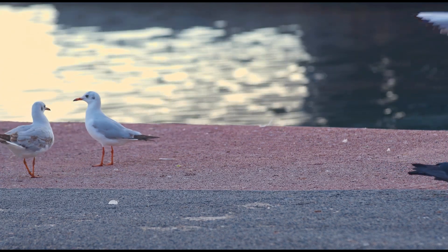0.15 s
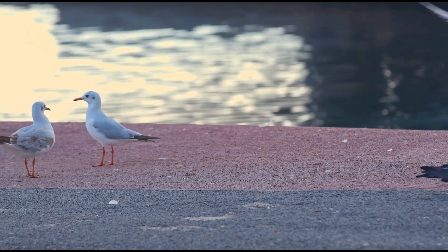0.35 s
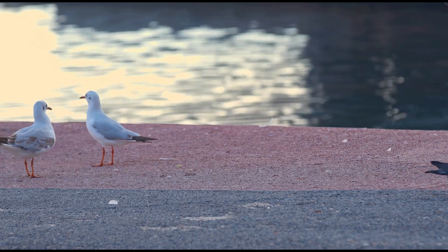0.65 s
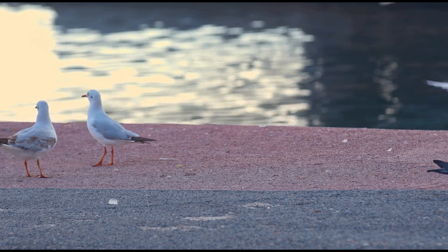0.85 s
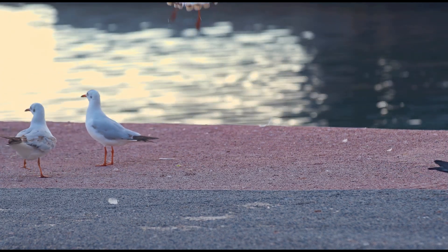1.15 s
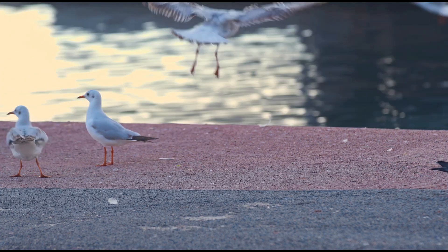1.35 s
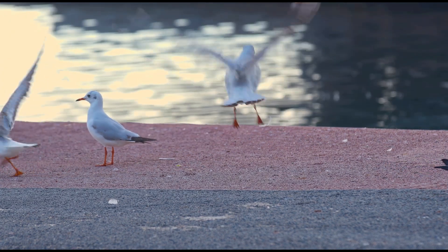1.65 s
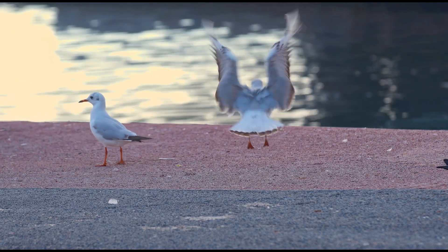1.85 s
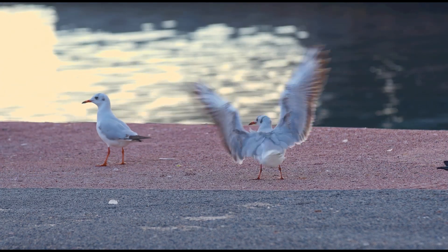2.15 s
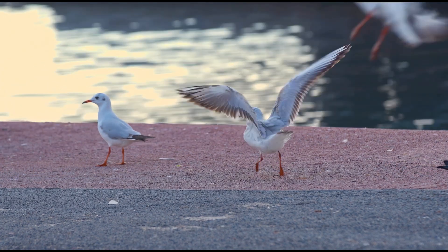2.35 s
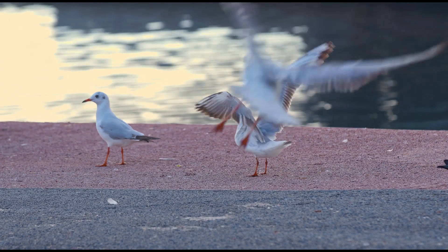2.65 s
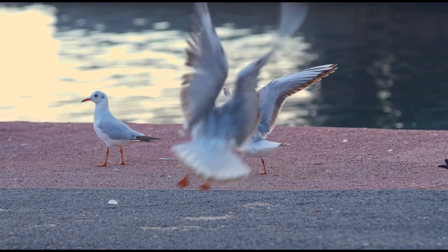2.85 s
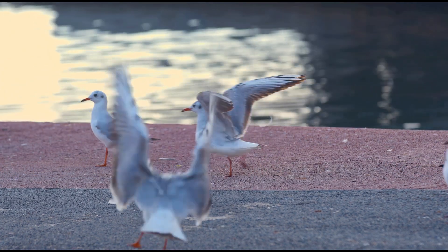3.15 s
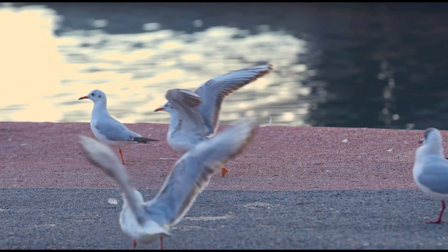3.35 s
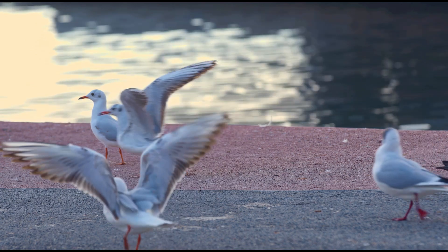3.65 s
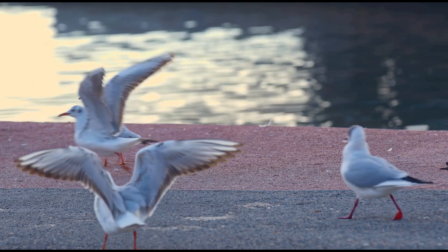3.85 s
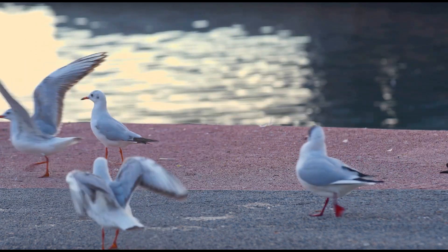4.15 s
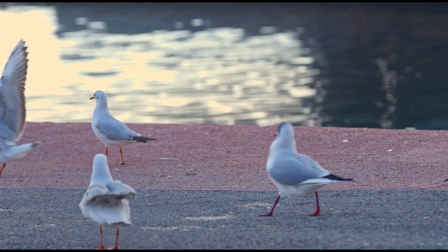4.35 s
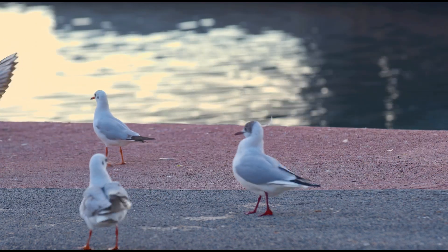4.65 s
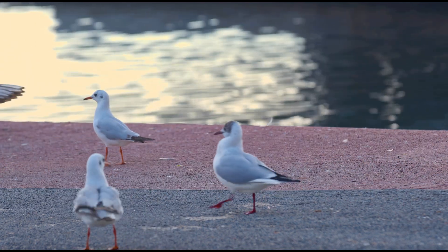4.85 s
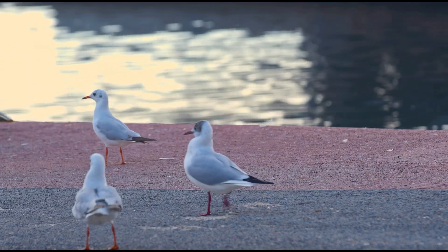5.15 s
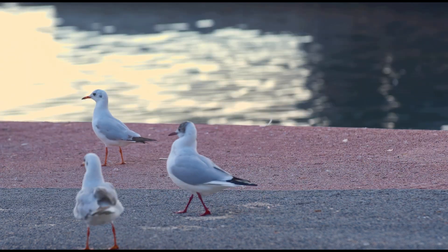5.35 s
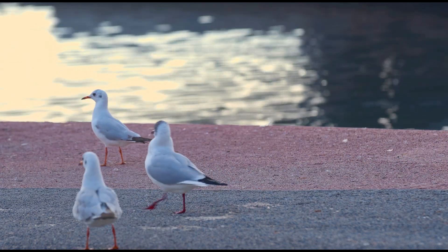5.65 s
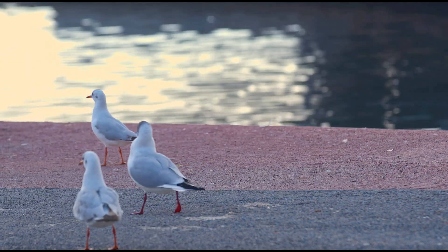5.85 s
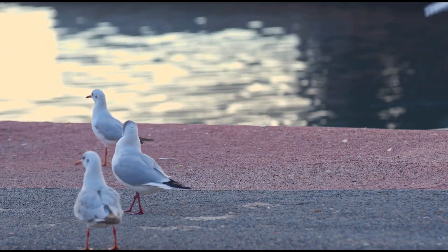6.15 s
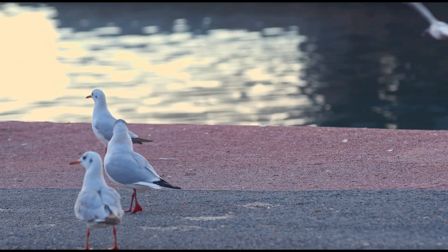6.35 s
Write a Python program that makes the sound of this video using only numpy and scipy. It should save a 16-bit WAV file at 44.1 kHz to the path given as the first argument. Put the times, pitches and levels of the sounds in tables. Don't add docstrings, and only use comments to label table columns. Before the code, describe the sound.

Open harbour edge in stereo: a deep steady drone, soft wind rumble and water washing against stone. A near gull, central and loud, gives four brief nasal yelps, the later ones less raspy, with a faint diffuse echo. Droplets and bubbles click between them. Then a quieter stretch brings faint distant bird whistles and low knocks, before bubbly wavelets swell again.

```python
import sys
import numpy as np
from scipy import signal
from scipy.io import wavfile
from scipy.ndimage import uniform_filter1d, minimum_filter1d

SR = 44100
rng = np.random.default_rng(int(sys.argv[2]) if len(sys.argv) > 2 else 0)


def to_wav(s):
    ch = np.atleast_2d(s).T
    pcm = np.round(np.clip(ch, -1, 1) * 32767)
    wavfile.write(sys.argv[1], SR, pcm.astype(np.int16))


def gain_from_decibels(decibels):
    exponent = np.asarray(decibels, float) / 20
    return 10 ** exponent


N = 286209

# (crest of the arch [s], crest pitch [Hz], clean hold after the crest [s],
# level at the crest [dB], level at the break [dB])
YELPS = [
    (.69, 696, 0.059, -9, -1),
    (1.302, 691, 0.059, -5, -6),
    (1.905, 692.8, .062, -5, -5.5),
    (2.478, 682.5, 0.057, -5, -7),
]


def yelp(crest_s, crest_hz, hold_s, crest_db, break_db):
    scrape_s, lock_s, climb_s, break_s, rasp_s, die_s = .024, .011, .033, .008, .06, .045
    climb_hz, rest_hz = 79.35, 410.6
    tired = 1 - np.exp(-(crest_s - YELPS[0][0]) / .61)
    start_s = crest_s - climb_s - lock_s - scrape_s
    s = np.cumsum([start_s, scrape_s, lock_s, climb_s, hold_s, break_s, rasp_s, die_s])
    t = np.arange(int(s[0] * SR), int(s[-1] * SR)) / SR

    rasp_db = -9 - 5.5 * tired
    level_db = np.interp(t, s, [-29, -21, -12.5, crest_db, break_db, rasp_db, rasp_db - 4, rasp_db - 28])

    climb = crest_hz - climb_hz * np.minimum((crest_s - t) / climb_s, 1) ** 2
    climb += np.interp(t, s[:3], [rest_hz + climb_hz - crest_hz, -105, 0])
    round_s = .027
    sag = crest_hz - 2300 * (np.hypot(np.minimum(t - crest_s, hold_s), round_s) - round_s)
    sag -= np.interp(t, s[4:6], [0, 34.83]) + 1900 * np.maximum(t - s[4], 0)
    hz = np.maximum(np.where(t < crest_s, climb, sag), rest_hz)

    bright_db = 5 - 4 * tired + .38 * (level_db + 4.5)
    return t, hz, level_db, bright_db


def gull(wobble=.021, half_db=-5, rasp_depth=.55, rasp_rate=520, drive=.35, breath_db=-42):
    # (frequency [Hz], level [dB])
    throat = [(350, -28.5), (650, -25), (900, -39.5), (1100, -5.5), (1260, 7), (1450, -3.5), (1650, -10),
              (2050, -19), (2400, -34.5), (2800, -34), (3550, -37), (3880, -33.5), (4150, -61),
              (4500, -44.5)]
    slack_hz, slack_width_hz = 592, 23.5
    out, airy = np.zeros((2, N))
    for row in YELPS:
        t, *columns = yelp(*row)
        start = round(t[0] * SR)
        stop = start + len(t)
        hz, db, bright_db = (uniform_filter1d(c, size=200) for c in columns)
        slack = .653 / (1 + np.exp((hz - slack_hz) / slack_width_hz))
        hz = hz * (1 + (wobble + .032 * slack) * walk(160 * len(t) / SR, (len(t),)))
        phase = 2 * np.pi * np.cumsum(hz) / SR

        orders = np.arange(1, 17)[:, None] / 2
        part_hz = orders * hz
        gains = gain_from_decibels(table(throat, part_hz) + bright_db * (part_hz > 2400))
        gains *= np.where(orders % 1, slack * gain_from_decibels(half_db), 1)
        gains /= np.sqrt(uniform_filter1d(np.sum(gains ** 2, axis=0), size=400) / 2)

        depth = np.clip(.045 * (orders - 1.2) ** 2, .09, .5) + rasp_depth * slack
        beats = 1 + depth * walk(rasp_rate * len(t) / SR, (16, len(t)))
        beats /= np.sqrt(1 + depth ** 2)
        tones = np.sin(orders * phase + 2 * np.pi * rng.random(orders.shape))
        edges = np.minimum(1, np.minimum(t - t[0], t[-1] - t) / 0.0055)
        out[start:stop] = np.sum(gains * beats * tones, axis=0) * gain_from_decibels(db) * edges
        airy[start:stop] = gain_from_decibels(1.8 * bright_db)

    bill = signal.butter(2, (3200, 4400), "band", fs=SR, output="sos")
    air = signal.sosfilt(bill, rng.standard_normal(N))
    loudness = np.sqrt(uniform_filter1d(out ** 2, size=150) + 1e-12)
    out += airy * air / air.std() * loudness * gain_from_decibels(breath_db)
    out = np.tanh(drive * out) / np.tanh(drive) * 1.073
    return signal.sosfiltfilt(signal.ellip(6, .5, 40, 4330, fs=SR, output="sos"), out)


def quay(voice, t60=1.1, wet_db=-23, side_db=-20):
    t = np.arange(SR) / SR
    tails = rng.standard_normal((2, SR)) * gain_from_decibels(-60 * t / t60) * (t > .02)
    mid, side = (signal.fftconvolve(voice, tail / np.linalg.norm(tail))[:N] * gain_from_decibels(wet_db) for tail in tails)
    return voice + mid + gain_from_decibels(side_db) * side * np.array([[1], [-1]])


def wash(t):
    # (breaks [s], crest [dB], rise [s], fall [dB per s], left minus right [dB])
    wall_waves = [(.1, -60, 0.22, 34, -0.5), (.86, -50.5, 0.045, 20.5, 1.5), (.9, -39, 0.26, 12, 1.5),
                  (1.2, -40.5, 0.12, 38.5, 1), (1.7, -59.5, 0.25, 3.5, 2), (2.25, -54.5, 0.078, 18, -3.5),
                  (2.85, -61, 0.22, 7.5, -4.5), (4, -63.5, 0.15, 3.5, -2.5), (2.33, -48, 0.047, 300, -4),
                  (2.45, -52.5, 0.18, 15, -5), (2.72, -56, 0.019, 152, -5),
                  (3.38, -55.5, 0.024, 10.5, -11.5), (3.45, -58.5, 0.27, 16, -10),
                  (3.6, -64, 0.11, 63, -10.5), (5.3, -54.5, 0.24, 10, 6.5), (5.6, -47, 0.28, 23.5, 3),
                  (6.08, -46, 0.024, 200, 1.5), (6.1, -52.5, .1, 8.5, 0.5), (6.3, -55, 0.18, 10, -8.5)]
    calm_db, calm_pan_db = -64.5, -6.5
    at, crest_db, rise, fall_db, pan_db = np.array(wall_waves).T[:, :, None]
    since = t - at
    climb_db = 14.5 * (1 - since / rise) ** 2
    drain_db = fall_db * (since - rise) + 13 * (since - rise) ** 2
    db = crest_db - np.where(since < rise, climb_db, drain_db)
    power, calm = gain_from_decibels(2 * db), gain_from_decibels(2 * calm_db)
    total = power.sum(axis=0) + calm
    return 10 * np.log10(total), ((power * pan_db).sum(axis=0) + calm * calm_pan_db) / total


def waves(trim_db=14, body_trim_db=-6, spray_trim_db=4):
    # (frequency [Hz], level [dB per Hz])
    fizz_colour = [(180, -37.5), (300, -7), (420, -5.5), (700, -8.5), (1050, -4.5), (1500, -13),
                   (2200, -17.5), (4500, -18), (8000, -24.5), (11500, -24), (14500, -37)]
    # (frequency [Hz], unrelated part minus shared part [dB])
    fizz_side = [(300, -10), (1200, -14), (3000, -16), (6000, -10.5), (10000, -8), (14000, -7)]
    # (time [s], level [dB], length [s])
    surges = [
        (.2, -40, 0.27),
        (.76, -33, 0.063),
        (1.84, -30.5, 0.13),
        (2.3, -33, .08),
        (3.7, -38, 0.17),
        (5.92, -31, 0.17),
    ]

    def shape(hz, t):
        low = 1 / (1 + (hz / 1800) ** 2)
        high = 1 / (1 + (9000 / (hz + 1)) ** 4)
        fizz, pan_db = wash(t)
        body = -34 + .58 * (wash(t - .084)[0] + 50)
        body = 10 * np.log10(gain_from_decibels(2 * body) + bumps(surges, t)) + body_trim_db
        spray = -56.5 + spray_trim_db + 1.35 * (fizz + 50) - .3 * pan_db
        swell = low * body + high * spray + (1 - low - high) * fizz
        return table(fizz_colour, hz) - table(fizz_colour, 3400.0) + swell + trim_db - 60 * (hz < 250)

    def lean(hz, t):
        return wash(t)[1] / (1 + 900 / (hz + 1))

    return hiss(shape, fizz_side, lean, flicker_db=1.3, flicker_rate=60, size=256, lag=1.28)


def droplets(rate=260, over_db=4.0, spread_db=4.0):
    # (time [s], peak [dB], pitch [Hz], left minus right [dB])
    drops = [(0.276, -40, 2980, -8), (0.876, -32, 3680, -2), (0.9215, -26, 3070, -1),
             (0.9637, -31, 2760, -3.5), (0.9781, -25, 3810, 2), (1.0328, -24, 3100, -2),
             (2.074, -45, 2900, -3.5), (2.18, -33.5, 2900, 0), (2.237, -36.5, 4340, -2),
             (2.3206, -39, 4100, -4.5), (2.355, -30.5, 3420, -7), (2.372, -25, 4260, -8),
             (2.433, -29.5, 3060, 3.5), (2.9048, -34, 3180, -4), (3.3983, -37, 2900, -5),
             (3.631, -37, 5550, -12.5), (5.4303, -42.5, 4330, -1), (5.5573, -39, 3090, 2),
             (5.68, -38, 4440, -2.5), (5.756, -32.5, 3050, 4), (5.8173, -31, 3400, 3),
             (5.9094, -33.5, 3040, 3), (6.101, -28, 4440, 1), (6.1526, -36.5, 4430, 2),
             (6.223, -28.5, 3540, 1.5), (6.2837, -39, 3330, -6.5), (6.3125, -37, 2900, -6),
             (6.386, -33.5, 4200, -5), (6.454, -40.5, 3050, -8)]
    # (time [s], peak [dB], pitch [Hz], ring [s])
    plops = [
        (.887, -22.5, 776, 0.028),
        (.988, -32, 1380, 0.013),
        (1.032, -27, 1700, 0.0077),
        (2.346, -17.5, 923, 0.0074),
        (3.615, -27.5, 744, 0.024),
    ]
    out = np.zeros((2, N + SR))
    chance = rng.random((int(rate * N / SR), 5))
    fizz_db, pan_db = wash(chance[:, 0] * N / SR)
    rows = []
    for (when, luck, pitch, side, size), fizz, pan in zip(chance, fizz_db, pan_db):
        hz = 1500 * 6 ** pitch
        db = fizz + over_db - spread_db * np.log(0.033 + luck)
        rows.append((when * N / SR, db, hz, pan + 16 * (side - .5), (2 + 14 * size ** 2) / hz))
    rows += [(at, db, hz, pan, .0022) for at, db, hz, pan in drops]
    rows += [(at, db, hz, 0, length) for at, db, hz, length in plops]
    for at, db, hz, pan, length in rows:
        t = np.arange(int(2 * length * SR) + 8) / SR
        start = int(at * SR)
        gain = gain_from_decibels(db + 4.5 + np.array([[pan], [-pan]]) / 2)
        out[:, start:start + len(t)] += ring(t, hz, length, glide=.16) * gain

    fade = np.exp(-np.arange(200) / SR / .0007)
    for at, db, hz, pan in drops:
        noise = rng.standard_normal(200) + .4 * rng.standard_normal((2, 200))
        tick = signal.lfilter([1, 0, -1], [1, -.9, .3], noise) * fade
        start = int(at * SR)
        out[:, start:start + 200] += tick * gain_from_decibels(db - 11.5 + np.array([[pan], [-pan]]) / 2)
    return out[:, :N]


def distant():
    # (time [s], length [s], start pitch [Hz], end pitch [Hz], level [dB])
    far_birds = [
        (4.17, 0.044, 1840, 1870, -40),
        (4.19, 0.053, 1610, 1600, -42),
        (4.24, 0.063, 1790, 1770, -41.5),
        (4.36, 0.055, 1760, 1690, -54),
    ]
    # (time [s], pitch [Hz], level [dB], ring [s])
    knocks = [
        (4.775, 62, -25, 0.065),
        (4.83, 55, -20, .05),
        (4.837, 165, -22, 0.06),
        (4.905, 132, -20, 0.095),
        (5.254, 85, -18, 0.054),
        (5.278, 152, -21, 0.057),
    ]
    out = np.zeros(N)
    for at, length, start_hz, end_hz, db in far_birds:
        count = int(length * SR)
        start = int(at * SR)
        hz = np.linspace(start_hz, end_hz, count) * (1 + 0.013 * walk(8, (count,)))
        whistle = np.sin(2 * np.pi * np.cumsum(hz) / SR) * np.hanning(count)
        out[start:start + count] += whistle * gain_from_decibels(db + 1.5)
    for at, hz, db, length in knocks:
        t = np.arange(int(2 * length * SR)) / SR
        start = int(at * SR)
        out[start:start + len(t)] += ring(t, hz, length, glide=.02) * gain_from_decibels(db + 1.5)
    return out


def harbour():
    # (frequency [Hz], level [dB per Hz])
    drone = [(15, -36), (30, -17.5), (60, -15.5), (140, 0.5), (250, -2.5), (380, -12), (650, -20.5),
             (1000, -21.5), (1300, -25.5), (1850, -26), (2200, -34.5), (4500, -50.5), (10000, -51.5),
             (13500, -69)]
    # (frequency [Hz], unrelated part minus shared part [dB])
    drone_side = [(60, -2), (110, -6), (200, -9.5), (370, -8.5), (680, -6.5), (1250, -4.5), (2300, -6),
                  (4230, -2.5), (7770, -3.5), (14300, -2.5)]
    # (frequency [Hz], left minus right [dB])
    drone_balance = [(60, 12), (110, 2), (200, 6), (370, -0.5), (680, 3), (1250, -4), (2300, 0.5),
                     (4230, 7.5), (7770, 3), (14300, 0.5)]
    drone_db, still_db = -29.5, -40

    def shape(hz, t):
        return table(drone, hz) + (wind(t) - still_db) / (1 + (hz / 90) ** 4)

    def lean(hz, t):
        return table(drone_balance, hz)

    x = hiss(shape, drone_side, lean, flicker_db=1.86, flicker_rate=8.5, size=2048, lag=0.28)
    usual = np.median(np.sqrt(uniform_filter1d(x.mean(axis=0) ** 2, size=SR // 2)))
    return x * gain_from_decibels(drone_db) / usual


def wind(t):
    # (time [s], level [dB], length [s])
    gusts = [
        (0.503, -34.5, 0.34),
        (1.202, -36.5, 0.25),
        (1.86, -29, 0.19),
        (2.49, -32.5, .06),
        (4.638, -33, .04),
        (4.823, -22, .035),
        (5.3, -37, 0.2),
    ]
    breeze = -38 - 13 * np.exp(-t / .25) - 1.5 * t + 2 * walk(37, (len(t),))
    return 10 * np.log10(gain_from_decibels(2 * breeze) + bumps(gusts, t))


def hiss(shape_db, side_db, balance_db, flicker_db, flicker_rate, size, lag):
    t = np.arange(N // (size // 4) + 2) * (size // 4) / SR
    hz = np.arange(size // 2 + 1) * SR / size
    own = walk(flicker_rate * N / SR, (24, len(t)))
    flicker = own[np.clip(3 * np.log2(hz / 80 + 1), 0, 23).astype(int)]
    gain = gain_from_decibels(shape_db(hz[:, None], t) + flicker_db * flicker)
    noise = rng.standard_normal((2, 2, len(hz), len(t)))
    mid, side = noise[0] + 1j * noise[1]
    side *= gain_from_decibels(table(side_db, hz))[:, None]
    lean = gain_from_decibels(balance_db(hz[:, None], t) / 2)
    late = np.exp(-2j * np.pi * hz[:, None] * lag / SR)
    both = np.array([(mid + side) * lean * late, (mid - side) / lean]) * gain
    return signal.istft(both, nperseg=size, noverlap=3 * size // 4)[1][:, :N] / np.sqrt(size)


def ring(t, hz, length, glide):
    tone = np.sin(2 * np.pi * hz * t * (1 + glide * t / length))
    return tone * np.exp(-3 * t / length) * (1 - np.exp(-t / length * 12))


def bumps(rows, t):
    at, db, length = np.array(rows).T[:, :, None]
    return np.sum(gain_from_decibels(2 * db) * np.exp(-((t - at) / length) ** 2), axis=0)


def walk(rate, size):
    width = max(int(size[-1] / rate), 1)
    x = uniform_filter1d(rng.standard_normal(size), width, axis=-1)
    x = uniform_filter1d(x, width, axis=-1)
    return x / x.std()


def table(points, hz):
    points = np.array(points)
    return np.interp(np.log(np.maximum(hz, 1)), np.log(points[:, 0]), points[:, 1])


def scene():
    return quay(gull()) + waves() + droplets() + distant() + harbour()


def top_cut(x):
    return signal.sosfilt(signal.butter(12, 14880, fs=SR, output="sos"), x)


def record(dry):
    dull = signal.sosfilt(signal.butter(6, 13900, fs=SR, output="sos"), dry)
    peak = np.abs(dull).max(axis=0) + 1e-9
    room = minimum_filter1d(np.minimum(1, 1 / peak), size=201)
    mix = dull * uniform_filter1d(room, size=101)
    return top_cut(mix)


dry = scene()
out = record(dry)
to_wav(out)
```